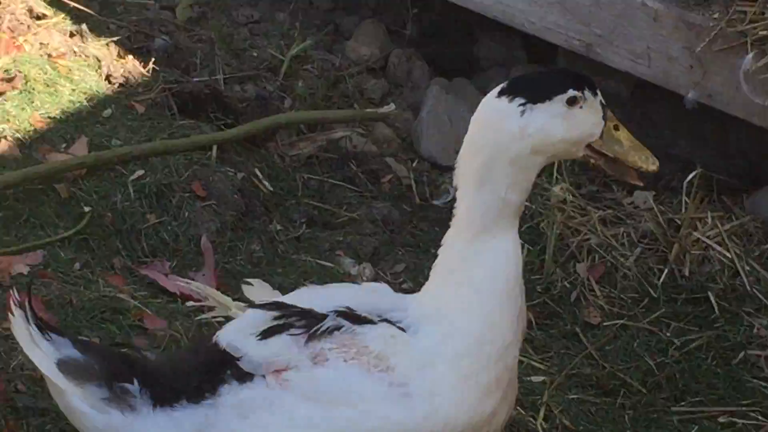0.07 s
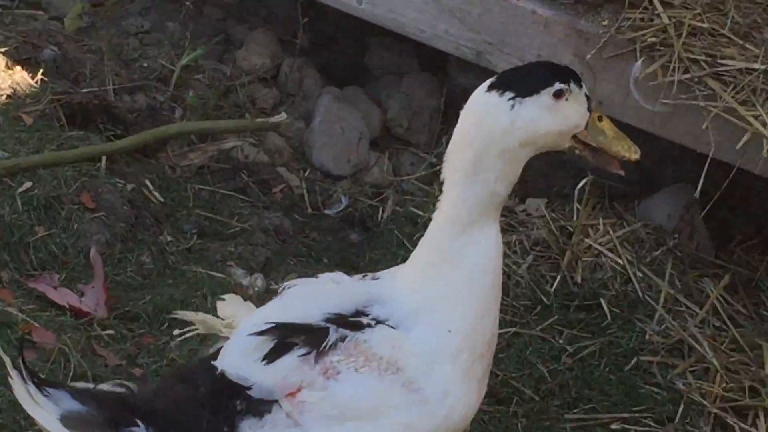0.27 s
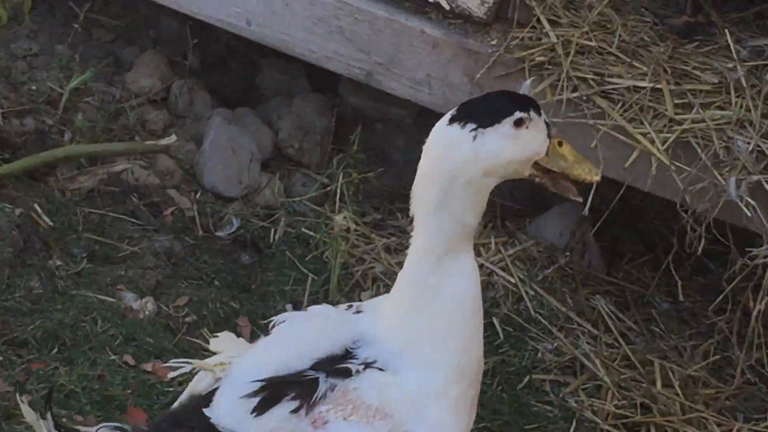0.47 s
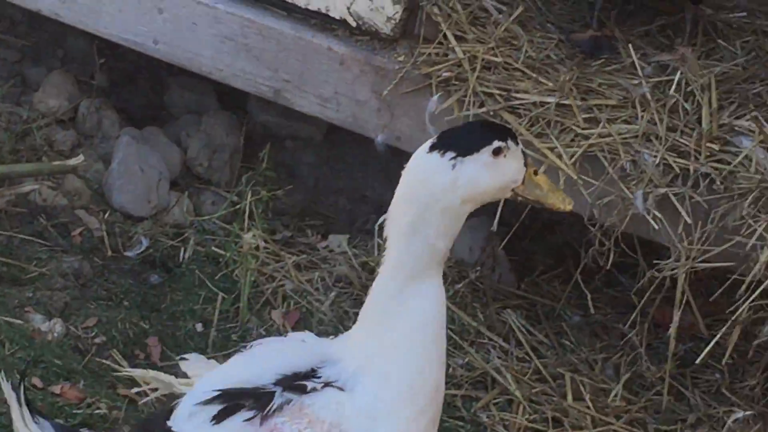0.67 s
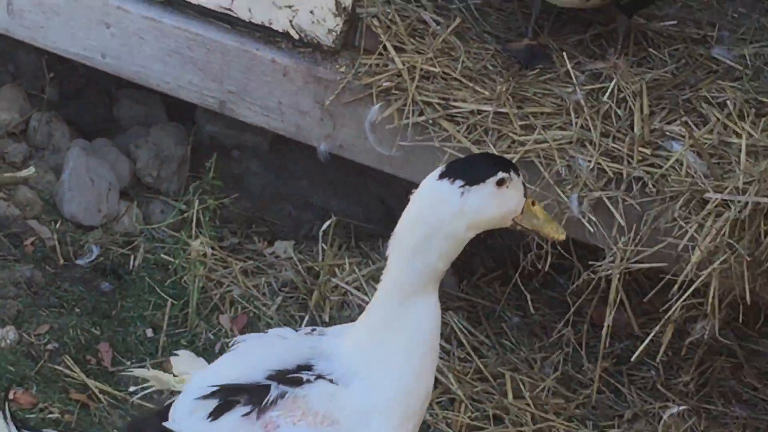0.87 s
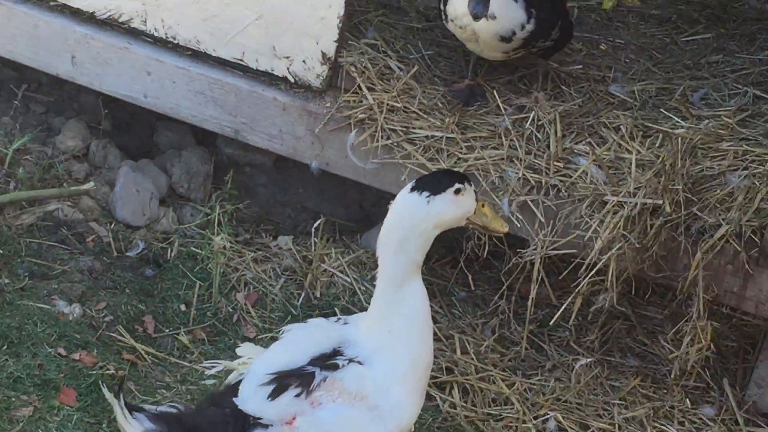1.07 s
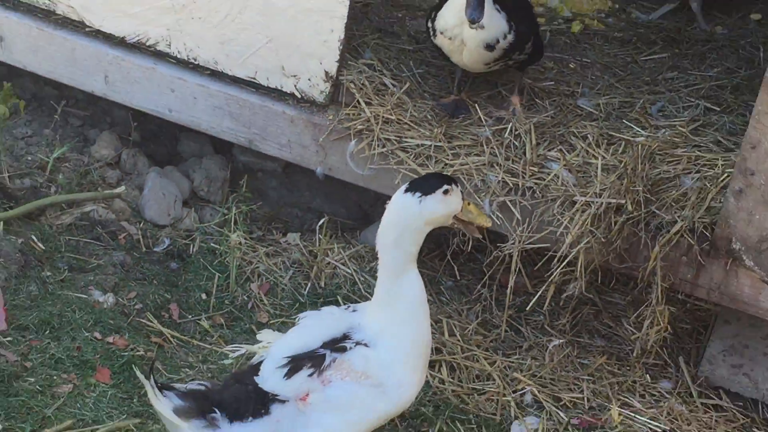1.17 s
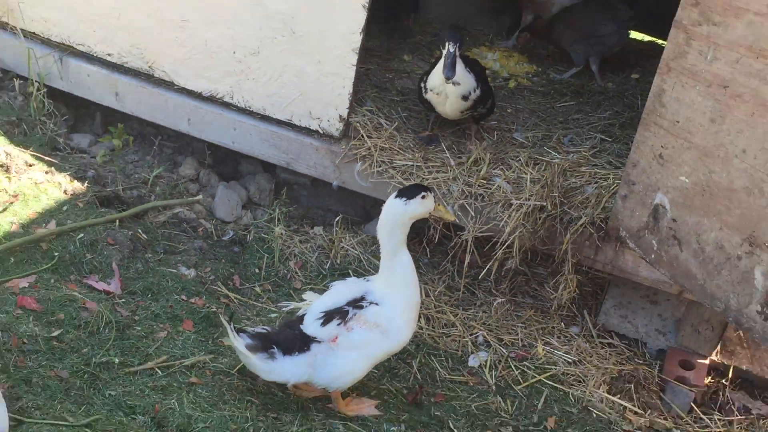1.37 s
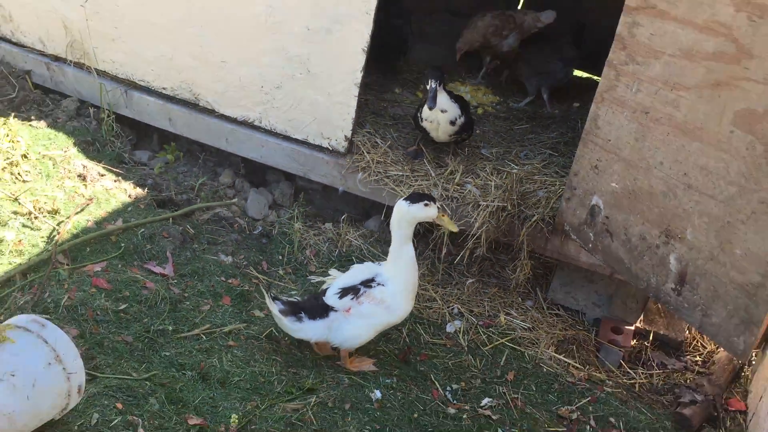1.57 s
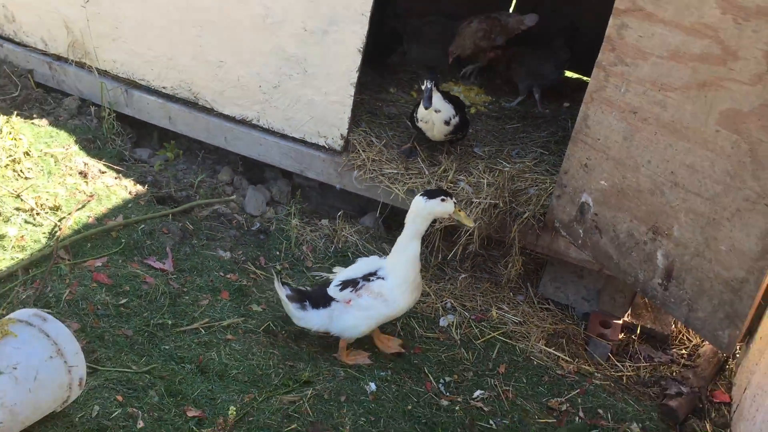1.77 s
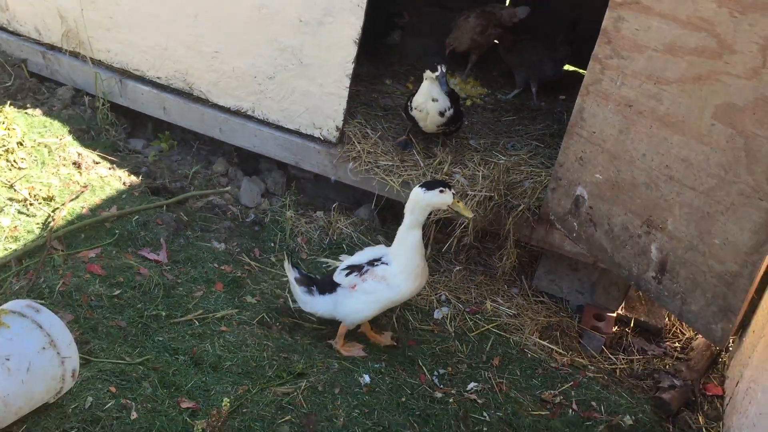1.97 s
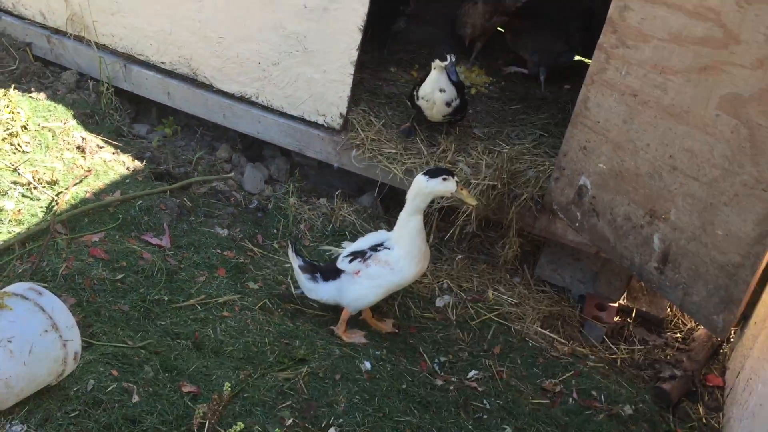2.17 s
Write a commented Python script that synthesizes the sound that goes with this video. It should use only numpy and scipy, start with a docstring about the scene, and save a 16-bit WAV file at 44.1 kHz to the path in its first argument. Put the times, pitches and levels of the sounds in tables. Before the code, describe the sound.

A duck quacks close to the microphone, about a dozen short nasal calls in quick succession, already under way at the start, with faint thin peeps and squeaks between, over a low outdoor rumble beside a wooden coop.

```python
"""A duck's quack, already under way, then more in quick succession, close by in front of a wooden coop.
Each quack is an arch of syrinx pulses: soft creak, loud nasal middle, rough sagging end.
Thin arched peeps, tones with air, fall between and beside the quacks; lower squeaks, level or dipping,
mostly sound as a quack opens. The coop answers with early echoes and a short diffuse tail.
Filtered noise gives a low outdoor rumble, a soft bump and faint rustles."""
import sys
import numpy as np
from scipy import signal
from scipy.fft import rfft, irfft, next_fast_len
from scipy.io import wavfile
from scipy.ndimage import uniform_filter1d, map_coordinates

SR = 44100
rng = np.random.default_rng(int(sys.argv[2]) if len(sys.argv) > 2 else 0)


def store_wav(level_fs):
    """Save 16-bit WAV to argv[1]."""
    pcm = np.round(np.clip(np.atleast_2d(level_fs), -1, 1) * 32767)
    wavfile.write(sys.argv[1], SR, pcm.T.astype(np.int16))


N = 97505

# Yard rumble and hiss spectrum: f/Hz, level/dB
YARD_SPECTRUM = [(20, -29.5), (40, -17.5), (65, 0), (110, 1), (190, -1), (280, -10), (400, -13.5),
                 (780, -24.5), (1200, -18.5), (2000, -16), (3000, -29), (6000, -31.5), (15500, -38.5)]
# Rustles: middle t/s, 1/e half-length/s, level/dB
RUSTLES = [(0.072, 0.042, -52), (1.367, 0.057, -56), (1.90, 0.042, -55)]
# Rustle spectrum: f/Hz, level/dB
RUSTLE_SPECTRUM = [(500, -16), (3000, -2), (7000, 0), (15000, 1)]
# Bump spectrum: f/Hz, level/dB
THUD_SPECTRUM = [(20, -37), (45, -6), (70, -2), (110, -1.5), (250, -44), (800, -79)]
# Coop tail decay: f/Hz, t60/s
COOP_T60 = [(200, .25), (1700, 0.19), (4000, 0.11), (12000, 0.17)]
# Coop echo and tail colour: f/Hz, level/dB
COOP_COLOUR = [(200, -2.5), (900, -1.5), (1700, -7.5), (3500, 0), (12000, -9.5)]
# Peeps: middle t/s, half-length/s, nominal top pitch f/Hz, droop at ends/share, level/dB
PEEPS = [(.108, .016, 1690, .12, -38), (.149, .038, 1998, .25, -35), (.432, .024, 1843, .15, -35.5),
         (.618, .045, 2144, .08, -43.5), (1.294, .052, 1920, 0.4, -37), (1.906, .024, 1615, .12, -42.5),
         (1.938, .016, 1930, .08, -38), (2.117, .048, 1882, .36, -37.5)]
# Squeaks: middle t/s, half-length/s, nominal lowest pitch f/Hz, lift at ends/share, level/dB
SQUEAKS = [(.140, .028, 1110, .13, -45), (.714, 0.0136, 1130, 0, -30), (.358, .018, 1150, .25, -33.5),
           (1.574, 0.015, 1130, .15, -36.5), (1.947, 0.023, 1130, 0, -38)]
# Air in peeps and squeaks, spectrum: f/Hz, level/dB
PEEP_AIR_SPECTRUM = [(300, -61), (900, -12.5), (1600, 1.5), (2200, -10), (2900, -19.5), (4000, -18),
                     (8000, -29.5), (14000, -40)]
# Windpipe and throat resonances: f/Hz, width/Hz, level/dB
THROAT_RESONANCES = [(291.6, 91, -4.5), (592.5, 78, -12), (723, 294, -1), (1180, 180, -15.5),
                     (1560, 382, 1), (2140, 510, 3), (3204, 487, -5.5), (3855, 174, -4.5), (4507, 344, -3),
                     (5358, 303, -6.5), (6074, 284, -7), (6840, 344, -14.5), (7900, 1340, -20)]
# Throat gain floor around the resonances: f/Hz, level/dB
THROAT_BASE = [(60, -72), (170, 0), (420, -44.5), (1000, -49), (4000, -26.5), (7000, -44), (9500, -32.5),
               (12000, -46.5), (15000, -52)]
# Narrow gaps between resonances: f/Hz, 1/e half-width/Hz, level/dB
THROAT_GAPS = [(443, 59, -11.5), (977, 27, -4), (2880, 43, -4.5), (4996, 83, -12), (5560, 59, -4)]
# Syrinx air-noise spectrum: f/Hz, level/dB
RASP_SPECTRUM = [(100, -30), (600, -20), (1500, -5), (4000, 0), (12000, 2)]
# Quacks: start t/s, lead-in/s, hold/s, release/s, pitch crest after start/s, arch half-width/s,
# crest pitch f/Hz, level/dB, chest/dB, treble/dB, bill resonance at crest f/Hz, bill resonance/dB,
# roughness 0-1, lead-in level/dB
QUACKS = [ (-.030, 0.029, 0.024, 0.021, 0.041, .040, 270.6, -21, 2.5, 0, 1412, 12, 0.41, -22),
          (.180, 0.03, 0.027, 0.018, 0.041, 0.032, 261.2, -22, 4.5, -1, 1490, 12.5, 1, -10.5),
          (.330, 0.033, 0.035, 0.016, 0.046, 0.053, 289.3, -16, -3, 0, 1610, 7.5, 0.54, -22.5),
          (0.531, 0.026, 0.029, 0.026, 0.029, 0.051, 254.3, -21.5, 4, 4.5, 1474, 11, .25, -14),
          (0.687, 0.033, 0.033, 0.019, 0.048, 0.052, 281, -15, -2.5, 2.5, 1690, 10.5, 0.22, -19.5),
          (0.879, 0.022, 0.031, 0.02, .039, 0.042, 263.5, -23, 11.5, 6, 1574, 13.5, 0.13, -9.5),
          (1.04, .002, 0.004, 0.0077, 0.0045, .020, 236.5, -39.5, 9.5, 0, 1600, 4, 0.68, -4),
          (1.059, 0.019, 0.036, 0.016, .027, .042, 315, -15.5, -1, 0.5, 1660, 12.5, .4, -22),
          (1.228, 0.022, 0.025, 0.011, 0.031, 0.035, 273, -15.5, 2.5, 0.5, 1675, 15, 0.37, -9),
          (1.396, 0.02, 0.037, 0.018, .036, .036, 266.1, -18, 4.5, 4.5, 1567, 13, 0.25, -12),
          (1.564, 0.019, 0.046, 0.016, 0.034, 0.041, 283.8, -19, 1, 0.5, 1590, 11, 0.6, -26),
          (1.8, 0.034, 0.025, 0.018, 0.048, 0.024, 240.5, -25, 6.5, -5, 1560, 7, 0.98, -11.5),
          (1.938, 0.026, 0.048, 0.019, 0.053, 0.047, 261, -19, 2, 3, 1630, 9, .3, -14)]

# yard; level at t = 0
YARD_DB, YARD_FADE_DB_PER_S = -48.5, 3
THUD_S, THUD_LENGTH_S, THUD_DB = 0.13, 0.064, -39  # length: 1/e half-length

# coop; levels relative to the birds
COOP_DB, WALLS_DB = -22.5, -17
WALLS_NEAR_S, WALLS_FAR_S = 0.0046, 0.02

# peeps and squeaks; waver as share of pitch, overtone and air relative to the tone
PEEP_WAVER_SHARE, PEEP_FLUTTER_DB = 0.0275, 2
PEEP_OVERTONE_DB, SQUEAK_OVERTONE_DB, PEEP_AIR_DB = -23.5, -4.5, -7.5

# syrinx; slack pulse rate before the bill glide, flatness of the pitch arch
CREAK_HZ, ARCH_POWER = 165, 2.1
# pulse scatter: timing as share of a crest period, size in dB
JITTER_SHARE, SLACK_JITTER_SHARE, SIZE_SCATTER_DB = .042, .08, 1.2
RASP_DB, RASP_DECAY_CYCLES = 2, .45  # before roughness weighting; cycles of crest pitch

# loudness contour; attack is a time constant
ATTACK_S, SWELL_DB_PER_S, SAG_DB_PER_S = .0018, 1096, 54.5
RELEASE_DB, RELEASE_POWER = 10.5, 1.4  # power > 1: fade steepens

# windpipe: mean treble delay, onset, ripple spacing and depth
PIPE_DELAY_S, PIPE_HZ, PIPE_RIPPLE_HZ, PIPE_RIPPLE_DB = .0008, 1300, 350, 1.8
GRAIN_DB = 2.6

# vocal colour; DULL: extra treble loss per dB of effort lost
CHEST_HZ, BRIGHT_HZ, DULL_DB_PER_DB = 950, 2600, 0.48
BILL_WIDTH_HZ, BILL_GLIDE_SHARE = 117, .08

TOP_HZ = 15650


def amp(db):
    """Decibels to gain."""
    return 10 ** (np.asarray(db) / 20)


def unit(x):
    """Scale to rms 1."""
    return x / np.sqrt(np.mean(x ** 2) + 1e-20)


def along(points, hz):
    """Interpolate (f/Hz, value) points on a log axis."""
    f, v = np.transpose(points)
    return np.interp(np.log(hz + 1), np.log(f + 1), v)


def above(hz, edge_hz):
    """Smooth step from 0 below the edge to 1 above it."""
    return 1 - 1 / (1 + (hz / edge_hz) ** 6)


def wobble(knots_per_s):
    """Smooth random curve."""
    knots = rng.standard_normal(int(N * knots_per_s / SR) + 4)
    return map_coordinates(knots, [np.arange(N) * knots_per_s / SR])


def coloured(x, gain):
    """Filter x with this gain over frequency, at minimum phase via the folded cepstrum."""
    m = 2 * next_fast_len(len(x))
    log_gain = np.log(np.maximum(gain(np.fft.rfftfreq(m, 1 / SR)), 1e-6))
    cepstrum = irfft(log_gain, m)
    cepstrum[1:m // 2] *= 2
    cepstrum[m // 2 + 1:] = 0
    return irfft(rfft(x, m) * np.exp(rfft(cepstrum)), m)[:len(x)]


def noise(spectrum, size):
    """Noise of rms 1 with this spectrum."""
    return unit(coloured(rng.standard_normal(size), lambda hz: amp(along(spectrum, hz))))


def pulses(times_s, sizes, size):
    """Band-limited clicks placed between samples: windowed sincs."""
    at = times_s[:, None] * SR
    taps = np.floor(at).astype(int) + np.arange(-7, 9)
    shape = np.sinc(taps - at) * np.cos(np.pi * (taps - at) / 16) ** 2
    taps = np.clip(taps, 0, size - 1)
    return np.bincount(taps.ravel(), (sizes[:, None] * shape).ravel(), size)


def yard():
    """Low outdoor rumble and hiss that ease off, one soft bump, faint rustles: enveloped noise."""
    t = np.arange(N) / SR
    rumble = amp(YARD_DB - YARD_FADE_DB_PER_S * t) * noise(YARD_SPECTRUM, N)
    bump = amp(THUD_DB) * np.exp(-((t - THUD_S) / THUD_LENGTH_S) ** 2) * noise(THUD_SPECTRUM, N)
    swells = sum(amp(db) * np.exp(-((t - middle) / half) ** 2) for middle, half, db in RUSTLES)
    return rumble + bump + swells * noise(RUSTLE_SPECTRUM, N)


def coop(x):
    """Early echoes from ground and boards, plus a diffuse tail decaying at its own rate per frequency."""
    size = SR // 2
    hz, t, z = signal.stft(rng.standard_normal(size), SR, nperseg=256)
    tail_db = along(COOP_COLOUR, hz)[:, None] - 60 * t / along(COOP_T60, hz)[:, None]
    tail = signal.istft(z * amp(tail_db), SR, nperseg=256)[1][:size]

    where, strength = rng.random(size=10), rng.standard_normal(size=10)
    walls = pulses(WALLS_NEAR_S + (WALLS_FAR_S - WALLS_NEAR_S) * where, strength, size)
    walls = coloured(walls, lambda hz: amp(along(COOP_COLOUR, hz)))

    def answer(echo):
        """Convolve, then match the level of x."""
        return unit(signal.fftconvolve(x, echo)[:N]) * np.std(x)

    return amp(COOP_DB) * answer(tail) + amp(WALLS_DB) * answer(walls)


def peeper():
    """Wavering tones with an overtone and air: thin arched peeps, and lower squeaks, level or dipping."""
    t, out = np.arange(N) / SR, np.zeros(N)
    for notes, bend, overtone_db in ((PEEPS, -1, PEEP_OVERTONE_DB), (SQUEAKS, 1, SQUEAK_OVERTONE_DB)):
        waver = 1 + PEEP_WAVER_SHARE * wobble(400)
        flutter = amp(PEEP_FLUTTER_DB * wobble(130))
        air = amp(PEEP_AIR_DB) * noise(PEEP_AIR_SPECTRUM, N)
        for middle, half, hz, curve, db in notes:
            u = np.clip((t - middle) / half, -1, 1)
            pitch_hz = hz * (1 + bend * curve * u ** 2) * waver
            phase = 2 * np.pi * np.cumsum(pitch_hz) / SR
            tone = np.sqrt(2) * (np.sin(phase) + amp(overtone_db) * np.sin(2 * phase))
            out += amp(db) * (1 - u ** 2) * flutter * (tone + air)
    return out


def syrinx(t, tension, pitch_hz, rough):
    """Pulses that speed up with tension and scatter when slack; each lets through decaying air noise."""
    cycles = np.cumsum(CREAK_HZ + (pitch_hz - CREAK_HZ) * tension) / SR
    scatter, strength = rng.standard_normal((2, 80))[:, :int(cycles[-1])]
    times = np.interp(np.arange(len(scatter)), cycles, t)
    slack = 1 - np.interp(times, t, tension)
    jitter_s = (JITTER_SHARE * rough + SLACK_JITTER_SHARE * slack ** 2) / pitch_hz
    times = np.sort(np.abs(times + scatter * jitter_s))
    buzz = unit(pulses(times, amp(SIZE_SCATTER_DB * strength), len(t)))

    since_s = t - times[np.maximum(np.searchsorted(times, t) - 1, 0)]
    decay = np.exp(-np.abs(since_s) * pitch_hz / RASP_DECAY_CYCLES)
    rasp = unit(noise(RASP_SPECTRUM, len(t)) * decay)
    return buzz + amp(RASP_DB) * (rough + (1 - tension) ** 2) * rasp


def windpipe(x):
    """Frequency-dependent delay spreads the pulses; the treble ripple is redrawn for each call."""
    m = 2 * len(x)
    hz = np.fft.rfftfreq(m, 1 / SR)
    lag, ripple = [map_coordinates(knots, [hz / PIPE_RIPPLE_HZ]) for knots in rng.standard_normal((2, 200))]
    delay_s = PIPE_DELAY_S * (1 + np.tanh(1.5 * lag)) * above(hz, PIPE_HZ)
    gain = amp(PIPE_RIPPLE_DB * ripple * above(hz, BRIGHT_HZ))
    # phase is the integral of group delay
    turn = np.exp(-2j * np.pi * np.cumsum(delay_s) * hz[1])
    return irfft(rfft(x, m) * gain * turn, m)[:len(x)]


def grainy(x):
    """Smoothed random gain over time and frequency shifts the colour of the upper harmonics."""
    hz, t, z = signal.stft(x, SR, nperseg=256)
    field = uniform_filter1d(rng.standard_normal(z.shape), size=4, axis=0)
    field = unit(uniform_filter1d(field, size=4, axis=1))
    gain = amp(GRAIN_DB * field * above(hz, CHEST_HZ)[:, None])
    return signal.istft(z * gain, SR, nperseg=256)[1][:len(x)]


def throat(hz):
    """Gain of windpipe and throat: steep resonances over a dark base, cut by gaps."""
    peaks = sum(amp(db) / (1 + ((hz - centre) / width * np.sqrt(2)) ** 2) ** 1.38
                for centre, width, db in THROAT_RESONANCES)
    gaps_db = sum(db * np.exp(-((hz - centre) / width) ** 2) for centre, width, db in THROAT_GAPS)
    return (peaks + amp(along(THROAT_BASE, hz))) * amp(gaps_db)


def quack(lead, hold, release, crest, arch, pitch_hz, level_db, chest_db, treble_db,
          bill_hz, bill_db, rough, lead_db):
    """One call: syrinx source, tightest at the crest of the pitch arch, through throat and bill."""
    t = np.arange(SR // 5) / SR
    tension = np.exp(-np.abs((t - crest) / arch) ** ARCH_POWER)
    source = grainy(windpipe(syrinx(t, tension, pitch_hz, rough)))

    swell_db = np.clip((t - lead) * SWELL_DB_PER_S, lead_db, 0)
    fade_db = RELEASE_DB * (np.maximum(t - lead - hold, 0) / release) ** RELEASE_POWER
    sag_db = SAG_DB_PER_S * np.maximum(t - lead, 0)
    effort_db = swell_db - fade_db - sag_db

    # treble falls faster than body
    lowpass = signal.butter(2, BRIGHT_HZ, fs=SR, output="sos")
    body = signal.sosfiltfilt(lowpass, source, padtype=None)
    dulled = body + (source - body) * amp(DULL_DB_PER_DB * effort_db)
    driven = (1 - np.exp(-t / ATTACK_S)) * amp(effort_db) * dulled

    def tract(hz):
        """Throat gain with this call's chest, treble and bill."""
        tilt_db = chest_db * (1 - above(hz, CHEST_HZ)) + treble_db * above(hz, BRIGHT_HZ)
        bill_peak_db = bill_db / (1 + ((hz - bill_hz) / BILL_WIDTH_HZ) ** 2)
        return throat(hz) * amp(tilt_db + bill_peak_db)

    voice = coloured(driven, tract)
    # closing bill: slower readout off the crest sinks resonances and pitch together
    voice = map_coordinates(voice, [np.cumsum(1 - BILL_GLIDE_SHARE * (1 - tension))])
    return amp(level_db) * voice / np.sqrt(np.average(voice ** 2, weights=amp(effort_db) ** 2))


def duck():
    """The run of quacks, each its own pulsed call; padded since the first starts before t = 0."""
    out = np.zeros(N + 2 * SR)
    for start, *shape in QUACKS:
        call = quack(*shape)
        out[SR + round(start * SR):][:len(call)] += call
    return out[SR:SR + N]


def scene():
    """Quacks, peeps and squeaks, their echoes and the yard."""
    birds = duck() + peeper()
    return (birds + coop(birds) + yard())[None]


def record(dry):
    """Sharp band limit: nothing passes from TOP_HZ up."""
    m = next_fast_len(N + SR // 2)
    passband = np.fft.rfftfreq(m, 1 / SR) < TOP_HZ
    return irfft(rfft(dry, m) * passband, m)[..., :N]


dry = scene()
out = record(dry)
store_wav(out)
```